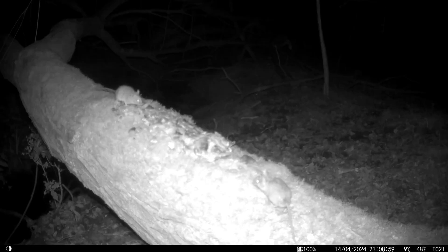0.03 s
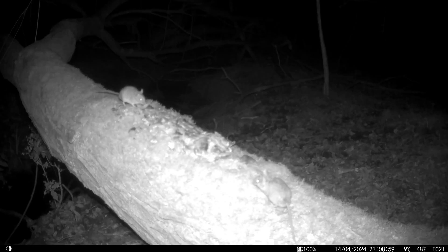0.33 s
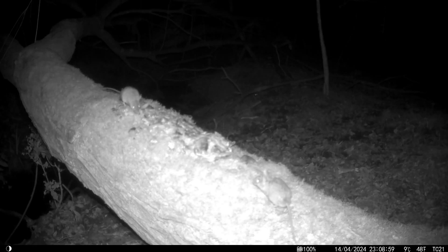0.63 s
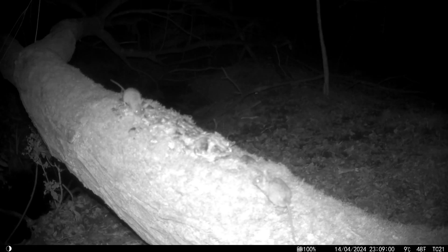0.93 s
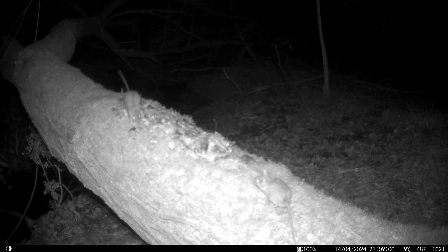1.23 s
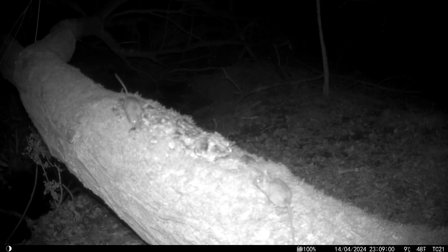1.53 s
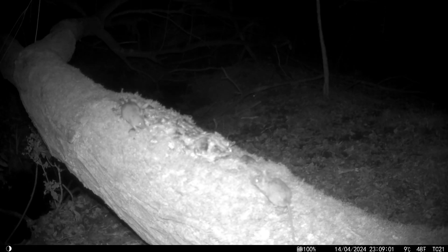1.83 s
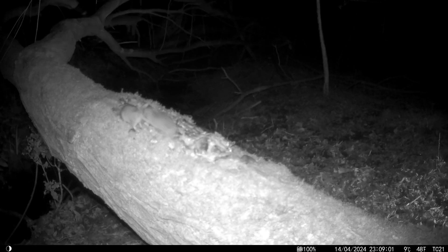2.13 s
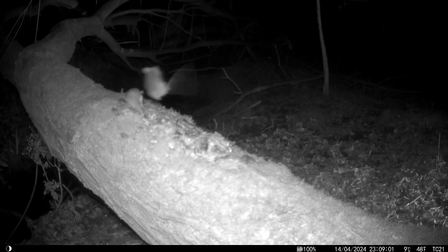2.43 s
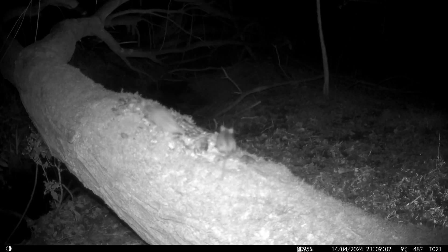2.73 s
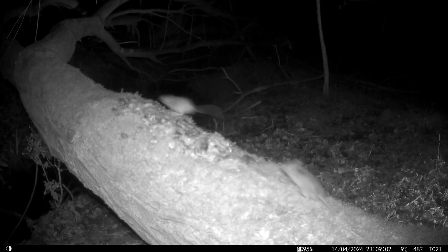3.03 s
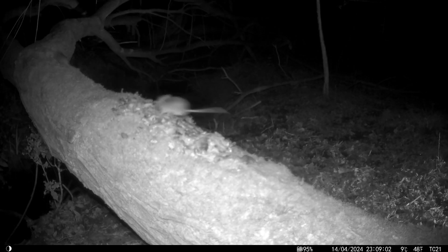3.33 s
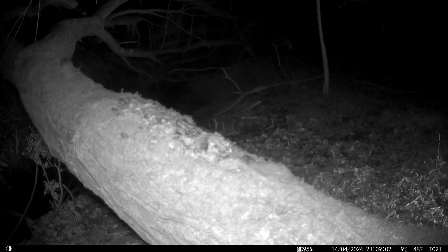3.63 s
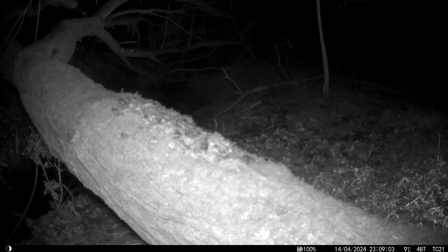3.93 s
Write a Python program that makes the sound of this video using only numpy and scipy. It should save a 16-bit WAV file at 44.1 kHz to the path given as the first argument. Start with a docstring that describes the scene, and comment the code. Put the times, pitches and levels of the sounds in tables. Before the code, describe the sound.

Small mice patter and bump along a hollow log in night woods, quiet over steady microphone hiss and rumble. Faint drip-like ticks come first, then a scuffle brings dull scuffs, crackling leaves and sharp little snaps of bark.

```python
"""Mice scuffle and leap on a fallen log at night.
Their feet ring the hollow wood in a low patter that swells and fades, with thumps and dull scuffs.
Dry bark and leaves rustle and snap as they dart about. A hollow tone sinks through the patter.
Faint pitched ticks, perhaps drips, and one thin squeak sound over steady hiss and rumble."""
import sys
import numpy as np
from scipy import signal
from scipy.io import wavfile
from scipy.ndimage import uniform_filter1d

SR = 44100
rng = np.random.default_rng(int(sys.argv[2]) if len(sys.argv) > 2 else 0)


def wav_out(sig):
    """Save sig, one row per channel (or a flat mono array), as 16-bit PCM at SR to the path in sys.argv[1]."""
    wavfile.write(sys.argv[1], SR, np.round(np.clip(np.atleast_2d(sig).T, -1, 1) * 32767).astype(np.int16))


N = 176400
TIME = np.arange(N) / SR
STEPS_PER_S, STEP_SPREAD_DB = 900, 1.5

# Log resonances, deep and upper: f/Hz, gain/dB
LOG_DEEP = [(60, -50), (140, -29.5), (172, -14), (193, 2), (212, -2), (236, 0.5), (275, -15), (330, -21.5),
            (600, -41.5), (3000, -84)]
LOG_UPPER = [(100, -51.5), (240, -19), (285, -5), (310, -2), (352, 2.5), (375, -1.5), (402, 1), (445, -9),
             (485, -15.5), (535, -9.5), (595, -24), (690, -22), (1000, -36), (3000, -53.5)]
# Patter envelopes, deep and upper: t/s, level/dB
DEEP_ENVELOPE = [(0.05, -50), (0.16, -43.5), (0.29, -51), (0.46, -53), (0.49, -59), (0.92, -49),
                 (1.29, -51.5), (1.59, -46.5), (1.68, -55.5), (2.06, -45.5), (2.12, -56), (2.23, -45.5),
                 (2.28, -53.5), (2.58, -56.5), (2.95, -46), (3.17, -58.5), (3.29, -58), (3.36, -48.5),
                 (3.86, -57), (4.0, -49.5)]
UPPER_ENVELOPE = [(0.05, -51), (0.53, -56), (0.97, -54), (1.0, -47.5), (1.4, -54), (1.45, -49), (1.6, -48),
                  (2.02, -52), (2.04, -47.5), (2.14, -46.5), (2.17, -43.5), (2.26, -51), (2.36, -48.5),
                  (2.48, -54.5), (2.93, -46.5), (3.22, -52.5), (3.78, -47), (3.8, -52), (4.0, -54)]
# Soft thumps: t/s, peak level/dB
THUMP_HITS = [(0.060, -42), (0.150, -39), (1.546, -34.5), (1.666, -40), (2.211, -35), (2.815, -35),
              (2.931, -34)]


def patter():
    """Dense soft footfalls and a few heavier thumps ring the hollow log."""
    deep, upper = ring(LOG_DEEP), ring(LOG_UPPER)
    steps = clicks(STEPS_PER_S, STEP_SPREAD_DB)
    out = unit(signal.fftconvolve(steps, deep)[:N]) * envelope(DEEP_ENVELOPE)
    out += unit(signal.fftconvolve(steps, upper)[:N]) * envelope(UPPER_ENVELOPE) * amp(-1.5)
    thump = peaked(peaked(deep) + amp(0.5) * peaked(upper))
    for start_s, peak_db in THUMP_HITS:
        add(out, start_s, amp(peak_db) * thump)
    return out


# Scuff spectrum: f/Hz, gain/dB
SCUFF_SPECTRUM = [(300, -37), (520, 3.5), (690, -13), (1000, -38), (2000, -48)]
# Scuff envelope: t/s, level/dB
SCUFF_ENVELOPE = [(2.52, -90), (2.63, -63), (2.86, -54.5), (2.96, -58), (3.2, -88)]


def scuffs():
    """Feet knock dully during the leap and the tussle after it."""
    knocks = signal.fftconvolve(clicks(STEPS_PER_S, STEP_SPREAD_DB), ring(SCUFF_SPECTRUM))[:N]
    return unit(knocks) * envelope(SCUFF_ENVELOPE)


# Dry bark and leaves, also in snaps and ticks: f/Hz, gain/dB
BARK_SPECTRUM = [(150, -33), (600, -6), (1150, -8), (1750, -3), (2500, -7), (2850, 0), (3300, 1), (4200, 1),
                 (4900, 0), (5350, -4), (6300, -11.5), (7100, -13), (9000, -29.5), (15000, -55)]
# Rustle envelope: t/s, level/dB
RUSTLE_ENVELOPE = [(0, -68), (2.03, -72), (2.10, -53), (2.14, -71), (2.19, -59.5), (2.235, -48),
                   (2.28, -54.5), (2.335, -51.5), (2.38, -56), (2.42, -67.5), (2.60, -61), (2.635, -61),
                   (2.655, -50), (2.70, -59.5), (2.80, -54.5), (2.87, -51.5), (2.92, -50.5), (2.945, -46),
                   (2.985, -53), (3.04, -48.5), (3.14, -63.5), (3.26, -59.5), (3.48, -64.5), (3.55, -50.5),
                   (3.605, -60), (3.64, -52.5), (3.73, -68.5), (3.81, -62.5), (3.835, -52.5), (3.89, -68),
                   (4, -67)]


def rustle():
    """Tiny fractures of bark and leaf follow the bursts of running."""
    grains = signal.fftconvolve(clicks(per_s=1500, spread_db=2.5), ring(BARK_SPECTRUM))[:N]
    return unit(grains) * envelope(RUSTLE_ENVELOPE) * amp(-0.74)


# Twig modes: f/Hz, width/Hz, gain/dB
TWIG_MODES = [(2864, 130, -1.5), (3182, 150, -4), (3700, 130, -.5), (4190, 110, 1.5), (4515, 130, -4),
              (5930, 180, -10)]
# Snaps and claw scratches: t/s, level/dB, length/s, centre f/Hz, treble crack share/0-1
SNAP_HITS = [(1.043, -55, 0.0024, 3300, .05), (1.422, -57.5, .004, 4100, 0), (1.745, -54, .002, 3000, .05),
             (1.855, -54.5, .0028, 2800, .1), (2.105, -49, 0.0018, 4500, 0.46),
             (2.2157, -45, 0.0028, 2290, .05), (2.239, -45, 0.002, 2600, 0), (2.248, -41, .002, 3000, 0.1),
             (2.27, -43.5, 0.0009, 2600, 0), (2.3250, -38.5, .002, 3600, .05),
             (2.3287, -42.5, .0053, 3130, 0.24), (2.372, -47.5, 0.0026, 4000, 0),
             (2.6084, -46, .003, 3800, .05), (2.613, -36, 0.0021, 3200, .03),
             (2.646, -45, 0.0042, 1200, 0.2), (2.8865, -27.5, 0.00045, 4200, 0),
             (2.9333, -27, 0.0014, 2860, 0.16), (2.9361, -32, 0.0019, 4000, .05),
             (2.9372, -35.5, .002, 4000, 0.4), (3.007, -49, 0.0023, 4400, 0.45),
             (3.058, -50.5, 0.007, 1900, 0), (3.292, -44.5, .0015, 3800, 0.4),
             (3.384, -55, 0.0036, 3600, .1), (3.452, -50, 0.0021, 2100, 0), (3.828, -52, 0.013, 5600, 0.4)]


def snaps(slips_per_s=5100, slip_gain=0.29, scatter_t60_s=0.17, scatter_db=-17.5):
    """A crack and a quick run of slips ring the wood; the ground scatters the sound back."""
    out, t = np.zeros(N), TIME[:1024]
    treble = signal.butter(4, (5400, 7700), "bandpass", fs=SR, output="sos")
    crack = unit(signal.sosfilt(treble, 1. * (t == 0)))
    for start_s, db, length_s, centre_hz, crack_share in SNAP_HITS:
        slips = slip_gain * rng.standard_normal(len(t))
        slips *= (rng.random(len(t)) < slips_per_s / SR) & (t < length_s)
        slips[0] = 1
        twig = np.zeros(len(t))
        for k, (hz, width_hz, mode_db) in enumerate(TWIG_MODES):
            gain = (-1) ** k * amp(mode_db) * emphasis(hz, centre_hz)
            twig += gain * np.exp(-np.pi * width_hz * t) * np.sin(2 * np.pi * hz * t)
        bark = ring(BARK_SPECTRUM, centre_hz=centre_hz)[:len(t)]
        wood = unit(unit(bark) + amp(1.5) * unit(twig))
        snap = signal.fftconvolve(slips, wood + crack_share * crack)
        add(out, start_s, amp(db) * np.sqrt(length_s * SR) * snap / np.linalg.norm(snap))
    t = TIME[:SR // 2]
    tail = rng.standard_normal(len(t)) * amp(-60 * t / scatter_t60_s)
    return out + amp(scatter_db) * signal.fftconvolve(out, tail / np.linalg.norm(tail))[:N]


# Hollow tone glide: t/s, f/Hz, level/dB
HOLLOW_GLIDE = [(1.50, 439.5, -56), (1.58, 413.5, -48.5), (1.69, 398, -47), (1.79, 336.3, -51),
                (1.93, 313.4, -55)]


def hollow_tone():
    """A wavering tone sinks through the swell of the patter."""
    out = np.zeros(N)
    times_s, hz, db = np.transpose(HOLLOW_GLIDE)
    t = np.arange(times_s[0], times_s[-1], 1 / SR)
    tone = wavering(np.interp(t, times_s, hz), width_hz=15.4)
    add(out, times_s[0], amp(np.interp(t, times_s, db)) * tone)
    return out


# Pitched ticks: t/s, level/dB, f/Hz
TICK_HITS = [(0.058, -51, 3300), (0.231, -52.5, 1970), (0.300, -52.5, 2190), (0.529, -47, 2600),
             (0.562, -48.5, 2960), (0.624, -52, 3300), (0.785, -56, 4700), (0.878, -55, 1410),
             (0.947, -55, 3120), (1.089, -57, 1550), (1.160, -54, 3450), (1.255, -58, 3040),
             (1.329, -55, 5040), (1.388, -53, 3030), (1.661, -54.5, 1840), (1.706, -50.5, 2210),
             (1.729, -53, 1470), (1.831, -51.5, 2210), (1.913, -54, 4500), (3.207, -50, 1720),
             (3.315, -49, 3100), (3.451, -44, 2260)]


def ticks(width_hz=390, decay_s=0.022, strike_db=14.5, grains_per_s=660, crackle_db=-1):
    """Each tick is a dry crackle and one struck resonance, smeared by short reflections."""
    out, t = np.zeros(N), TIME[:SR // 10]
    pole_radius = np.exp(-np.pi * width_hz / SR)
    bark = ring(BARK_SPECTRUM)
    decay = np.exp(-t / decay_s)
    for start_s, db, hz in TICK_HITS:
        drive = rng.standard_normal(len(t)) * decay  # reflections
        drive[0] = amp(strike_db)
        pole = pole_radius * np.exp(2j * np.pi * hz / SR)
        tone = peaked(signal.lfilter([1], np.poly([pole, pole]), drive).real)
        grains = rng.uniform(-0.98, 1, len(t)) * decay
        grains *= rng.random(len(t)) < grains_per_s / SR
        grains[0] = 1
        crackle = peaked(signal.fftconvolve(grains, bark)[:len(t)])
        add(out, start_s, amp(db) * (tone + amp(crackle_db) * crackle))
    return out


def squeak(start_s=0.13, length_s=0.13, hz=4240, db=-66):
    """One thin, faint squeak."""
    out = np.zeros(N)
    pitch_hz = np.full(round(length_s * SR), hz)
    add(out, start_s, amp(db) * wavering(pitch_hz, width_hz=150))
    return out


# Hiss and rumble spectra: f/Hz, relative density/dB
HISS_SPECTRUM = [(20, -40), (300, -3), (600, 3), (1000, .3), (1500, -.5), (3200, -.7), (4500, -2.7),
                 (6000, -5.2), (9000, -6.3), (14000, -6.8), (15600, -9.5)]
RUMBLE_SPECTRUM = [(10, -20), (28, -3), (40, 0.5), (75, 1), (120, -4), (150, -6.5), (300, -16.5),
                   (1000, -23.5), (4000, -76)]


def background():
    """Even hiss and a low rumble."""
    hiss = amp(-59.6) * noise(HISS_SPECTRUM, patch_db=1.5, size=1024)
    rumble = amp(-59) * noise(RUMBLE_SPECTRUM, patch_db=1, size=4096)
    return hiss + rumble


def amp(db):
    """Decibels to gain."""
    return 10 ** (np.asarray(db) / 20)


def unit(x):
    """Scales to rms 1."""
    return x / np.sqrt(np.mean(x ** 2) + 1e-20)


def peaked(x):
    """Scales to peak 1."""
    return x / (abs(x).max() + 1e-20)


def spectrum_db(points, hz):
    """Interpolates (f/Hz, gain/dB) points over log frequency."""
    f, db = np.transpose(points)
    return np.interp(np.log(hz + 1), np.log(f + 1), db)


def envelope(points):
    """Gain over time from (t/s, level/dB) points."""
    return amp(np.interp(TIME, *np.transpose(points)))


def add(mix, start_s, sound):
    """Mixes a sound in at start_s."""
    part = mix[max(round(start_s * SR), 0):][:len(sound)]
    part += sound[:len(part)]


def emphasis(hz, centre_hz, half_width_oct=0.6):
    """Bell-shaped gain around a centre frequency."""
    return 1 / np.sqrt(1 + (np.log2((hz + 1) / centre_hz) / half_width_oct) ** 2)


def ring(points, size=4096, centre_hz=None):
    """Minimum-phase impulse response of a spectrum, with optional emphasis."""
    hz = abs(np.fft.fftfreq(size, 1 / SR))
    gain = amp(spectrum_db(points, hz)) * (emphasis(hz, centre_hz) if centre_hz else 1)
    log_response = np.conj(signal.hilbert(np.log(gain)))
    return np.fft.ifft(np.exp(log_response)).real


def clicks(per_s, spread_db):
    """Random tiny impacts, a few larger than the rest."""
    strength = amp(spread_db * np.minimum(rng.exponential(1, N), 4))
    return strength * rng.choice([-1., 1.], N) * (rng.random(N) < per_s / SR)


def wavering(hz, width_hz):
    """Soft-ended tone on a pitch curve; random phase drift sets its width."""
    drift = np.cumsum(rng.standard_normal(len(hz))) * np.sqrt(2 * np.pi * width_hz / SR)
    phase = 2 * np.pi * np.cumsum(hz) / SR + uniform_filter1d(drift, size=200)
    return unit(np.sin(phase)) * signal.windows.tukey(len(hz), .25)


def noise(points, patch_db, size):
    """Steady shaped noise with faint drifting patches."""
    hz = np.fft.rfftfreq(size, 1 / SR)
    real, imag, patches = rng.standard_normal((3, 4 * N // size + 5, len(hz)))
    patches = uniform_filter1d(patches, size=8, axis=0)  # over time
    patches = unit(uniform_filter1d(patches, size=10, axis=1))  # over frequency
    frames = (real + 1j * imag) * amp(spectrum_db(points, hz) + patch_db * patches)
    return unit(signal.istft(frames.T, nperseg=size, noverlap=size - size // 4)[1][:N])


def scene():
    """All sources summed, alike in both channels."""
    mono = background() + patter() + squeak() + hollow_tone() + scuffs() + rustle() + snaps() + ticks()
    return np.array([mono, mono])


def record(dry):
    """Brief silence, quick fade-in, low-pass."""
    silence_s, fade_s, cutoff_hz = 0.038, 0.024, 15530
    fade_in = np.clip((TIME - silence_s) / fade_s, 0, 1)
    lowpass = signal.firwin(1023, cutoff_hz, window=("kaiser", 9), fs=SR)
    return signal.oaconvolve(dry * fade_in, lowpass[None], "same")


dry = scene()
out = record(dry)
wav_out(out)
```